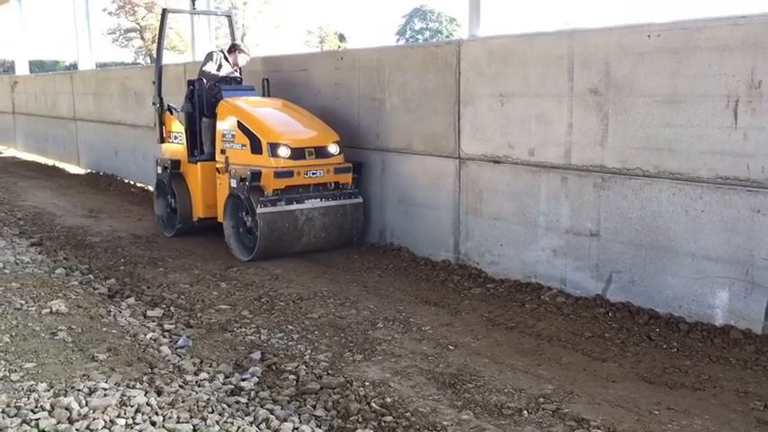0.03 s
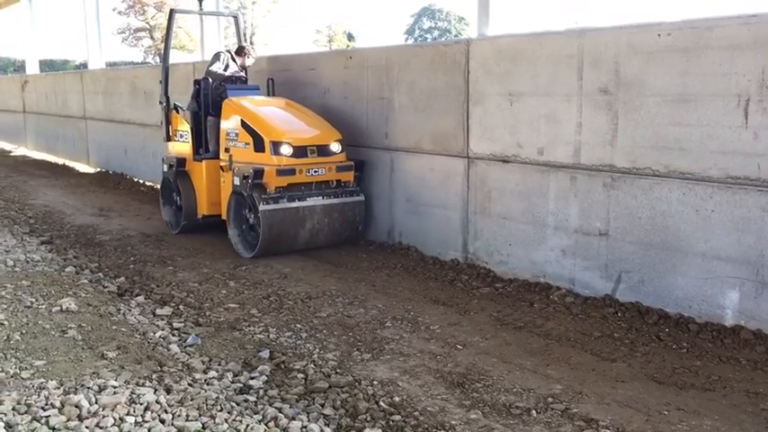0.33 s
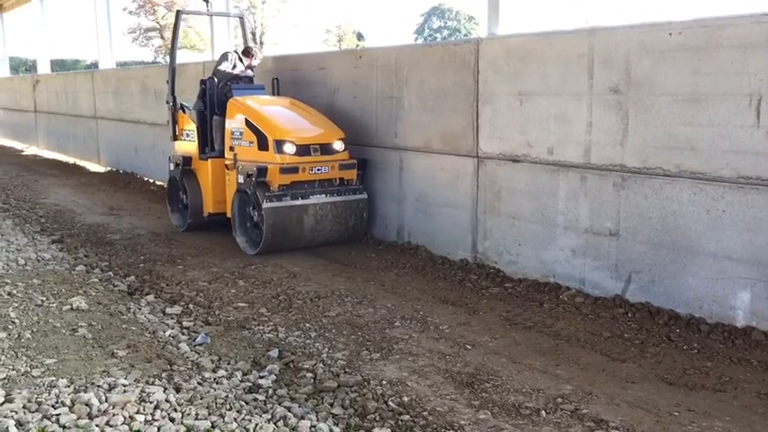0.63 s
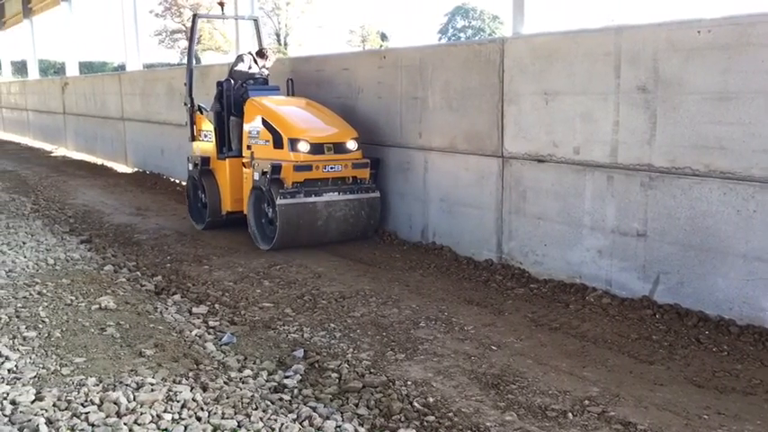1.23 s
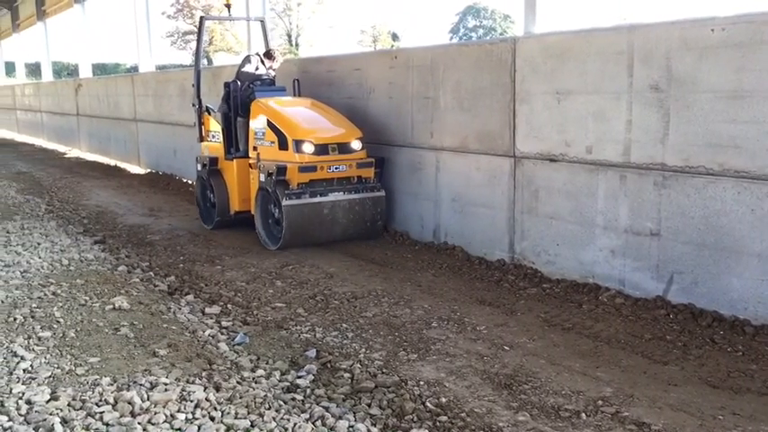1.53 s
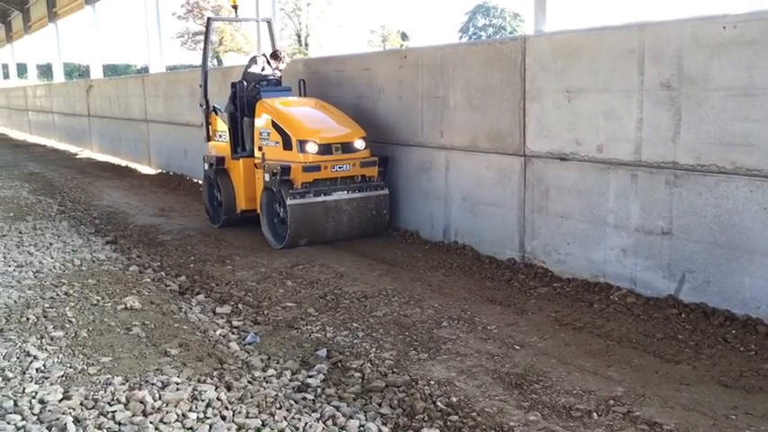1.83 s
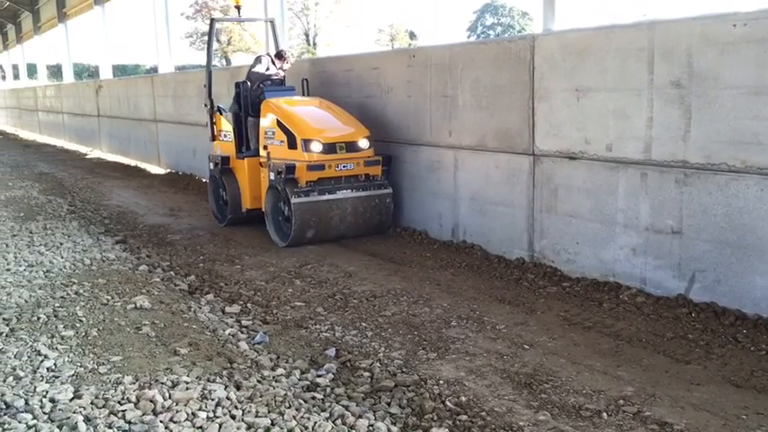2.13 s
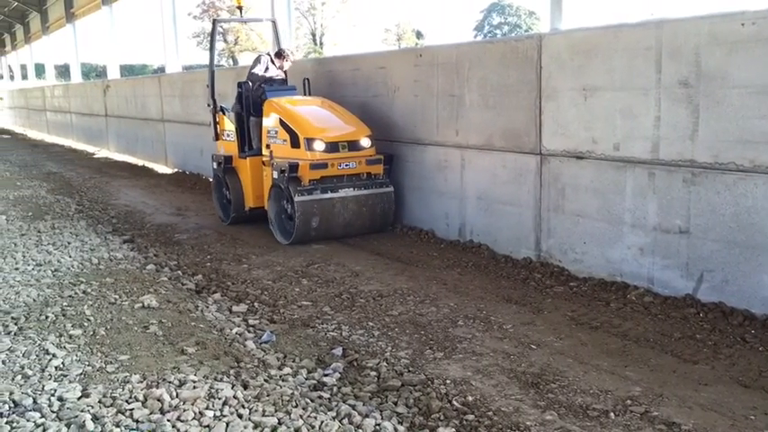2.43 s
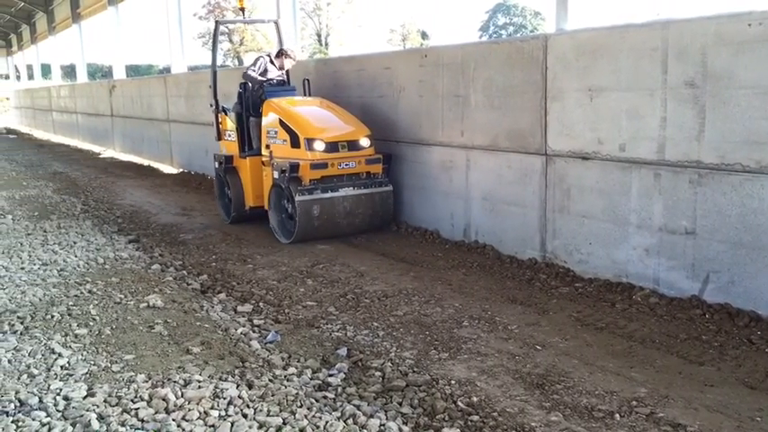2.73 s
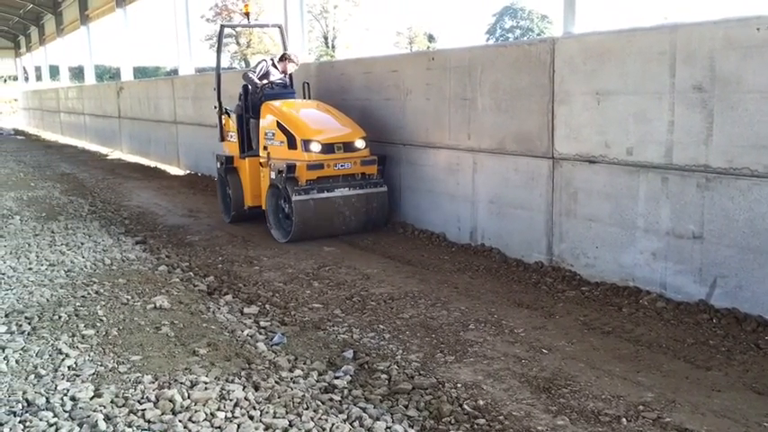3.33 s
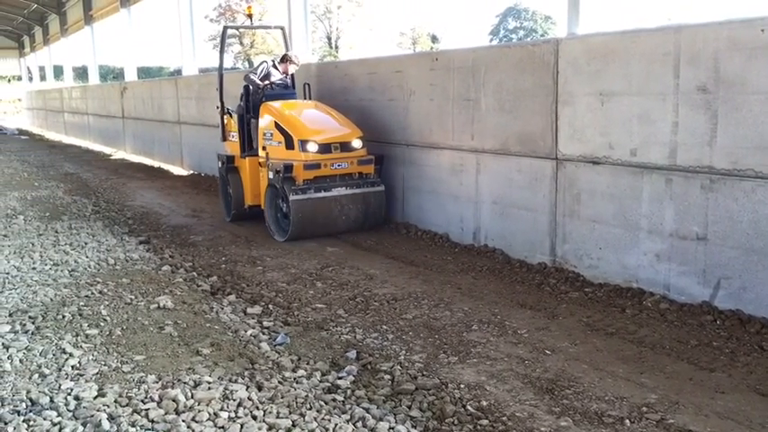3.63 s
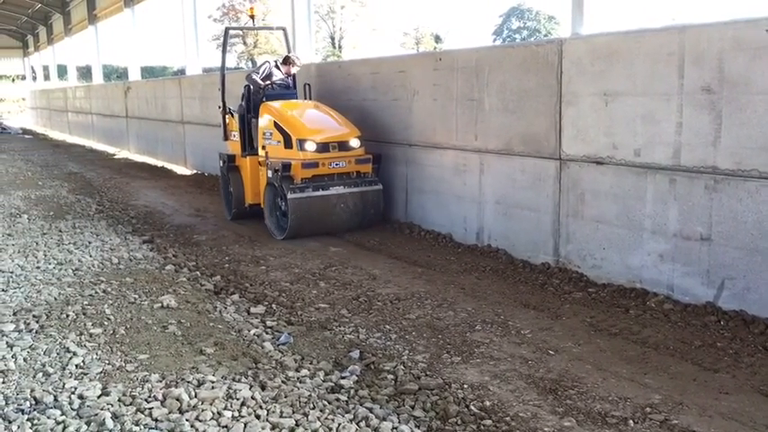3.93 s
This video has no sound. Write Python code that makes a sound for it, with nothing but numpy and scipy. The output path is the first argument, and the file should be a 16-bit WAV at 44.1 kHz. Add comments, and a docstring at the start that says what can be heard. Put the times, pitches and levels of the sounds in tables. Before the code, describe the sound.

A small road roller's deep vibrating hum and diesel clatter, with brief high squeaks.

```python
"""Bare ground beside a concrete wall, one microphone close to a small ride-on roller creeping along.
From the start its vibrating drum hums near 58 Hz and beats against a three-cylinder diesel, which
clatters while fan and hydraulics rush and whine. From 0.6 s a dry joint squeaks out once per shake,
and again from 1.7 s as the hum swells. Then the clatter eases; fainter squeaks return near the end."""
import sys
import numpy as np
from scipy import signal
from scipy.fft import rfft, irfft, next_fast_len
from scipy.io import wavfile
from scipy.ndimage import uniform_filter1d, map_coordinates

SR = 44100
rng = np.random.default_rng(int(sys.argv[2]) if len(sys.argv) > 2 else 0)


def master(y):
    """Save y as 16-bit WAV."""
    cut = np.clip(np.atleast_2d(y).T, -1, 1)
    pcm = np.round(cut * 32767)  # scale
    wavfile.write(sys.argv[1], SR, pcm.astype(np.int16))


N = 176400


def amp(db):
    """Decibels to gain."""
    return 10 ** (np.asarray(db) / 20)


def unit(x):
    """Scale to rms 1."""
    return x / np.sqrt(np.mean(x ** 2) + 1e-20)


def curves(rows):
    """One value per sample for each column after the time."""
    times, *columns = np.transpose(rows)
    return [np.interp(np.arange(N) / SR, times, column) for column in columns]


def wobble(rate):
    """A smooth random curve, rate knots a second."""
    return map_coordinates(rng.standard_normal(int(N * rate / SR) + 4), [np.arange(N) * rate / SR])


def filtered(x, response):
    """Filter x by a gain given as a function of frequency."""
    size = next_fast_len(N + SR // 4)
    return irfft(rfft(x, size) * response(np.fft.rfftfreq(size, 1 / SR)), size)[:N]


def rush(spectrum, patchy_db):
    """Coloured noise of rms 1, its gain patchy in time and frequency."""
    bins = signal.stft(rng.standard_normal(N), nperseg=2048)[2]
    patches = uniform_filter1d(rng.standard_normal(bins.shape), size=3, axis=0)
    patches = uniform_filter1d(patches, size=16, axis=1)
    noise = signal.istft(bins * amp(patchy_db * unit(patches)), nperseg=2048)[1][:N]
    knots_hz, db = np.transpose(spectrum)
    return unit(filtered(noise, lambda hz: amp(np.interp(np.log(hz + 1), np.log(knots_hz), db))))


def partials(turns, orders, waver_db, rough):
    """Tones on multiples of a rotation, wavering in level and in phase (rough, in radians)."""
    out = np.zeros(N)
    for multiple, db in orders:
        phase = 2 * np.pi * (multiple * turns + rng.random()) + rough * wobble(14)
        out += amp(db + waver_db * wobble(2.82)) * np.sqrt(2) * np.cos(phase)
    return out


# drum shake rate and engine firing rate, each (time [s], rate [Hz])
SHAKE_RATE = [(0, 57.25), (.45, 57.3), (.65, 57.68), (2.6, 57.78), (2.9, 57.15), (3.25, 57.7), (3.5, 57.95),
              (4, 57.75)]
FIRING_RATE = [(0, 66.8), (.5, 66.42), (1.3, 66.5), (1.9, 66.6), (2.35, 66.38), (2.7, 65.98), (3.35, 66.35),
               (3.7, 66.68), (4, 66.45)]
CYLINDERS = 3

def rotations():
    """Running counts of the drum weight's turns and the engine's four-stroke cycles."""
    turns = np.cumsum(curves(SHAKE_RATE)[0]) / SR
    cycles = np.cumsum(curves(FIRING_RATE)[0]) / SR / CYLINDERS
    return turns, cycles


# hum, and its second harmonic from uneven pressure on the soil, each (time [s], level [dB])
HUM_LEVEL = [(0, -15), (.6, -16), (1.15, -16), (1.7, -12), (2.05, -10.5), (2.45, -11), (2.75, -12),
             (3.4, -12), (4, -11.5)]
SOIL_LEVEL = [(0, -33), (.45, -32.5), (.9, -46), (1.35, -44), (1.8, -33), (2.25, -27), (2.65, -33.5),
              (3.3, -34), (3.9, -47)]
# overtones of the shaking frame (multiple of the shake rate, relative level [dB])
FRAME_ORDERS = [(3, -35.5), (4, -42.5)]

def drum(turns, swell):
    """The eccentric weight gives a clean deep hum; soil and frame add overtones."""
    (hum_db,), (soil_db,) = curves(HUM_LEVEL), curves(SOIL_LEVEL)
    hum = amp(hum_db + 0.1 * wobble(12)) * np.sqrt(2) * np.cos(2 * np.pi * turns)
    soil = amp(soil_db) * partials(turns, [(2, 0)], waver_db=2, rough=0.39)
    frame = swell * partials(turns, FRAME_ORDERS, waver_db=-1, rough=0.37)
    return hum + soil + frame


# ground rumble (frequency [Hz], relative level [dB])
GROUND_SPECTRUM = [(12, -14), (28, -2), (45, 0), (75, 0), (110, -18), (400, -70)]

def ground_rumble():
    """The shaken ground underfoot rumbles faintly below the hum."""
    return amp(-34.5) * rush(GROUND_SPECTRUM, patchy_db=2)


# firing note at the microphone (time [s], level [dB])
FIRING_NOTE_LEVEL = [(0, -42), (.45, -28.5), (.9, -28), (1.55, -24), (2.3, -34), (2.9, -32), (3.4, -38),
                     (4, -36)]
# engine overtones (multiple of the cycle rate, relative level [dB])
ENGINE_OVERTONES = [(5, -40), (6, -38), (8, -41.5), (9, -35), (10, -45.5), (11, -48), (12, -35), (18, -42),
                    (24, -53.5), (36, -46), (64, -42)]
# fan blade tone and high whine (time [s], fan level [dB], whine level [dB])
FAN_WHINE_LEVELS = [(0, -35.5, -44), (.35, -36, -45), (.75, -42, -42.5), (1.3, -40, -46), (2.1, -55, -57),
                    (2.8, -35, -47.5), (3.2, -43, -53), (3.6, -43, -48), (4, -37, -54)]
FAN_HZ, WHINE_HZ = 634.5, 3190

def engine_tones(cycles, shaft_s, swell):
    """Firing note, overtones and fan follow the engine speed; a thin whine half follows it."""
    (firing_db,), (fan_db, whine_db) = curves(FIRING_NOTE_LEVEL), curves(FAN_WHINE_LEVELS)
    firing = amp(firing_db) * np.sqrt(2) * np.cos(2 * np.pi * CYLINDERS * cycles)
    overtones = partials(cycles, ENGINE_OVERTONES, waver_db=0.54, rough=0.11)
    fan = partials(shaft_s, [(FAN_HZ, fan_db)], waver_db=1, rough=0.54)
    whine_s = .5 * (shaft_s + np.arange(N) / SR)
    whine = partials(whine_s, [(WHINE_HZ, whine_db)], waver_db=1, rough=.3)
    return firing + swell * overtones + fan + whine


# narrow rings of bonnet and pipes (frequency [Hz], width [Hz], boost [dB])
PANEL_RINGS = [(2536, 17, 3), (2490, 13, 3), (5560, 23, 5), (8200, 70, 4.5), (9420, 50, 5)]
RIPPLE_DB, RIPPLE_SPACING_HZ = 0.8, 22.22

def panels(noise):
    """Dense panel resonances and a few strong rings colour a noise on its way to the microphone."""
    ripple = rng.standard_normal(4096)

    def response(hz):
        rings_db = sum(db / (1 + (2 * (hz - centre) / width) ** 2) for centre, width, db in PANEL_RINGS)
        ripple_db = RIPPLE_DB * map_coordinates(ripple, [hz / RIPPLE_SPACING_HZ], mode="wrap")
        return amp(rings_db + ripple_db)
    return unit(filtered(noise, response))


# engine noise, relative levels (time [s], clatter [dB], hiss [dB])
CLATTER_HISS_LEVELS = [(0, -28.5, -42), (.15, -27, -40.5), (.62, -25.5, -39), (.74, -25, -35.5),
                       (1.0, -23.5, -36), (1.3, -23.5, -37), (1.63, -23.3, -38), (1.82, -24, -37),
                       (2.15, -25.5, -38.5), (2.4, -25.5, -39.5), (2.62, -28, -39.5), (2.8, -26.5, -40.2),
                       (3.15, -27.5, -41.7), (3.55, -27.5, -41.5), (4, -28.5, -42)]
# engine clatter and fan hiss, each (frequency [Hz], relative level [dB])
CLATTER_SPECTRUM = [(250, -32), (460, -7.5), (550, -2), (680, -3.5), (850, -1), (1150, -0.74), (1400, -0.5),
                    (1780, -2.5), (2050, -7.5), (2450, -9.5), (2700, -14.5), (3220, -12.5), (3800, -17),
                    (4900, -25), (8000, -45)]
HISS_SPECTRUM = [(1500, -19), (4200, -0.5), (4900, -4), (5800, -.5), (6600, 1), (7400, -1.5), (8200, -1.5),
                 (9600, -4), (10400, -7.5), (11000, -5), (13500, -7.5), (15200, -11)]
# knock pattern (multiple of the cycle rate, relative depth)
KNOCK_ORDERS = [(1, 0.075), (3, 0.049), (4, 0.062), (5, 0.038), (6, 0.039), (7, 0.043), (9, .07),
                (10, 0.095), (15, 0.092)]

def clatter_and_hiss(cycles):
    """Injectors and valves pulse the clatter and, more gently, the fan's flickering hiss."""
    clatter_db, hiss_db = curves(CLATTER_HISS_LEVELS)
    knock = sum(depth * np.cos(2 * np.pi * (k * cycles + rng.random())) for k, depth in KNOCK_ORDERS)
    clatter = unit(np.exp(0.51 * knock) * panels(rush(CLATTER_SPECTRUM, patchy_db=2)))
    flicker_db = 0.41 * wobble(150) + 0.57 * wobble(18)
    hiss = unit(np.exp(0.22 * knock) * panels(rush(HISS_SPECTRUM, patchy_db=2.5)))
    return amp(clatter_db + 0.76) * clatter + amp(hiss_db - 0.1 + flicker_db) * hiss


# bonnet resonances (time [s], low band level [dB], high band level [dB])
BONNET_BAND_LEVELS = [(0, -33, -41), (.45, -35, -42.5), (.85, -32, -39), (1.3, -34.5, -42),
                      (1.75, -32, -46), (2.05, -35.5, -48), (2.35, -28, -38), (2.6, -36.5, -43),
                      (3.1, -38.5, -46), (4, -50, -46)]
# the two bands, each (frequency [Hz], relative level [dB])
LOW_BAND = [(300, -58), (700, -18.5), (800, -1.5), (870, -1.5), (930, -5.5), (1050, -13), (2500, -50)]
HIGH_BAND = [(1500, -50), (2800, -13), (3080, -7), (3200, -2), (3320, -6), (3650, -10), (6000, -55)]

def bonnet():
    """Two broad resonances of the bonnet swell and fade as the roller moves."""
    low_db, high_db = curves(BONNET_BAND_LEVELS)
    return amp(low_db) * rush(LOW_BAND, patchy_db=1) + amp(high_db) * rush(HIGH_BAND, patchy_db=1.5)


# exhaust roar (frequency [Hz], relative level [dB])
EXHAUST_SPECTRUM = [(15, -12), (45, -8), (62, -1), (80, -4.5), (100, -5.5), (135, -7.5), (165, -1.5),
                    (205, 0.5), (255, -5), (300, -7), (400, -11.5), (2000, -56)]

def exhaust(exhaust_db):
    """Gas leaves the pipe with a low, uneven roar."""
    return amp(exhaust_db - 5) * rush(EXHAUST_SPECTRUM, patchy_db=3.5)


# pump tones (frequency at mean engine speed [Hz], relative level [dB])
PUMP_TONES = [(212, -40), (372, -39), (1273, -44.5)]
# drum motor tones (multiple of the shake rate, relative level [dB])
MOTOR_ORDERS = [(5, -40), (6, -47.5), (11, -47.5), (13, -45.5)]
# oil flow (frequency [Hz], relative level [dB])
FLOW_SPECTRUM = [(100, -43), (240, -17), (295, -1.5), (340, 3), (385, -1), (430, -9), (480, -11.5),
                 (700, -35), (2000, -70)]

def hydraulics(turns, shaft_s, drive_db):
    """Pump and drum motor drone in a narrow band of flow noise."""
    pump = partials(shaft_s, PUMP_TONES, waver_db=.9, rough=.4)
    motor = partials(turns, MOTOR_ORDERS, waver_db=1.5, rough=0.4)
    flow = amp(drive_db - 4.5) * rush(FLOW_SPECTRUM, patchy_db=1.6)
    return amp(0.86 * (drive_db - drive_db.mean())) * (pump + motor) + flow


# spells of squeaking (time [s], relative peak level [dB], pitch [Hz])
SQUEAK_SPELLS = [(0, -43, 6720), (.62, -38, 6700), (.71, -32, 7020), (.79, -32, 6540), (.93, -31.5, 6740),
                 (1.05, -31, 6500), (1.09, -51, 6550), (1.66, -50, 6850), (1.72, -28.5, 6940),
                 (1.82, -28, 6680), (1.9, -29.5, 6600), (1.99, -32, 6830), (2.17, -30, 6700),
                 (2.27, -52, 6760), (3.55, -43, 6800), (3.75, -36.5, 6920), (3.93, -37.5, 6850),
                 (4, -37, 6900)]
SLIP_AT_TURN, SLIP_JITTER_S, SQUEAK_GAIN_DB = .4, .0005, 2
SCATTER_HZ, RISE_HZ_PER_S, CHIRP_WIDTH_S = 70, 83000, 0.0014

def joint_squeak(turns):
    """A dry joint slips once per shake, each time with a short, rough, rising chirp."""
    out, t = np.zeros(N + SR), np.arange(-256, 256) / SR
    level_db, centre_hz = curves(SQUEAK_SPELLS)
    slips = np.searchsorted(turns, np.arange(int(turns[-1]) - 1) + SLIP_AT_TURN)
    scatter = rng.standard_normal((len(slips), 3))
    for i, (detune, accent_db, late) in zip(slips, scatter):
        hz = centre_hz[i] + SCATTER_HZ * detune + RISE_HZ_PER_S * t
        grit = unit(uniform_filter1d(rng.standard_normal(len(t)), size=30))
        phase = 2 * np.pi * np.cumsum(hz) / SR + 0.66 * grit
        envelope = amp(level_db[i] + accent_db) * np.exp(-.5 * (t / CHIRP_WIDTH_S) ** 2)
        start = max(0, i + round((SLIP_JITTER_S * late + t[0]) * SR))
        out[start:start + len(t)] += envelope * np.sin(phase)
    return amp(SQUEAK_GAIN_DB) * out[:N]


def wall_echo(x, delay_s=.007, echo_db=-9):
    """Direct sound plus its echo off the wall, which travels 2.4 m further to the microphone."""
    return filtered(x, lambda hz: 1 + amp(echo_db) * np.exp(-2j * np.pi * hz * delay_s))


# the low roar, relative levels (time [s], exhaust [dB], hydraulic drive [dB])
EXHAUST_DRIVE_LEVELS = [(0, -25.5, -32), (.35, -21.5, -36), (.65, -22.5, -28), (1.05, -22, -27.5),
                        (1.4, -23, -27), (1.85, -25, -27), (2.3, -26.5, -26), (2.7, -25, -33.5),
                        (3.05, -23.5, -34), (3.45, -30, -32), (4, -28.3, -33)]

def scene():
    """The roller from one spot; engine and frame overtones swell and fade with the exhaust."""
    turns, cycles = rotations()
    shaft_s = cycles / cycles[-1] * N / SR  # time as the crankshaft counts it
    exhaust_db, drive_db = curves(EXHAUST_DRIVE_LEVELS)
    swell = amp(1.09 * (exhaust_db - exhaust_db.mean()))
    mix = drum(turns, swell) + ground_rumble()
    mix += engine_tones(cycles, shaft_s, swell) + clatter_and_hiss(cycles) + bonnet()
    mix += exhaust(exhaust_db) + hydraulics(turns, shaft_s, drive_db)
    mix += wall_echo(joint_squeak(turns))
    return mix[None]


TOP_HZ = 15280

def record(dry):
    """One mono microphone, flat up to TOP_HZ and silent above."""
    return filtered(dry[0], lambda hz: hz < TOP_HZ)[None]


dry = scene()
out = record(dry)
master(out)
```